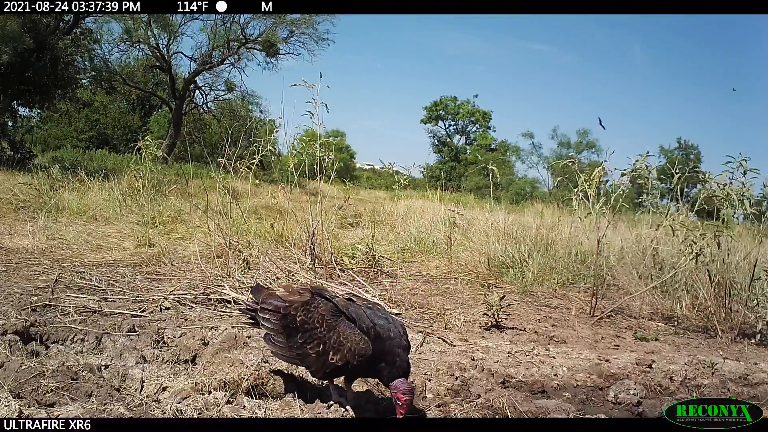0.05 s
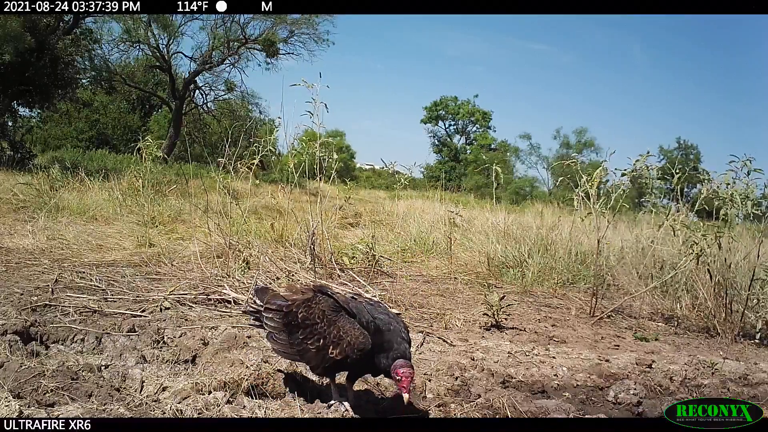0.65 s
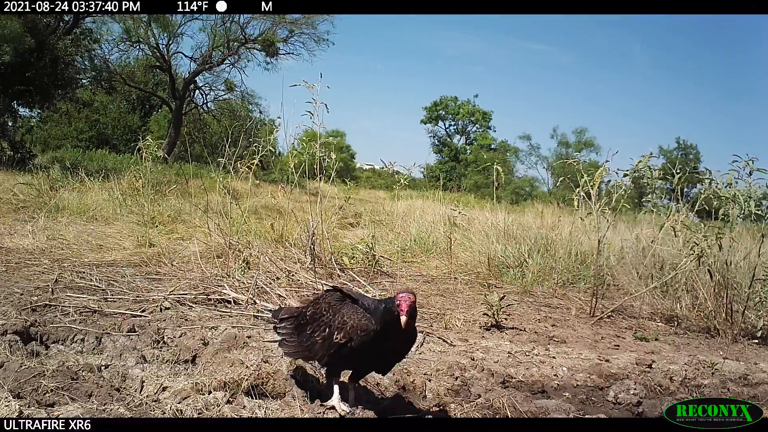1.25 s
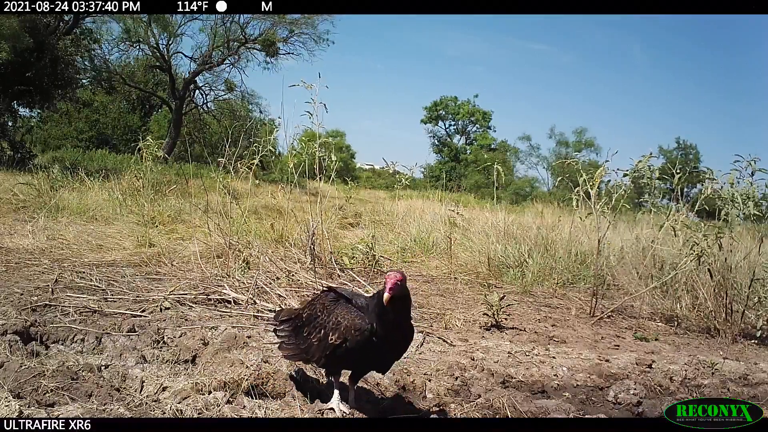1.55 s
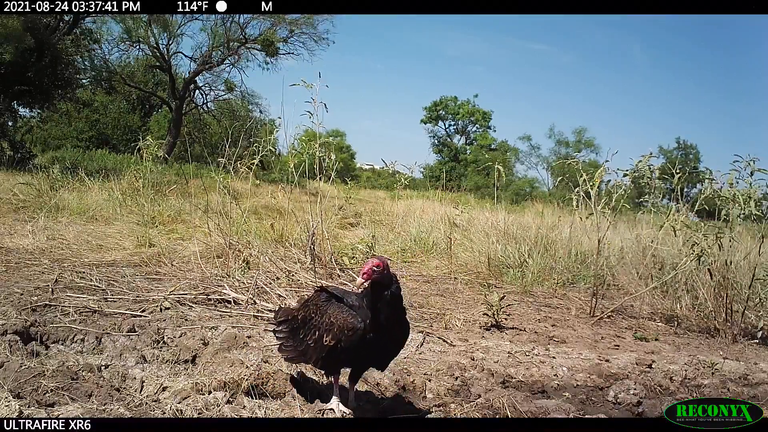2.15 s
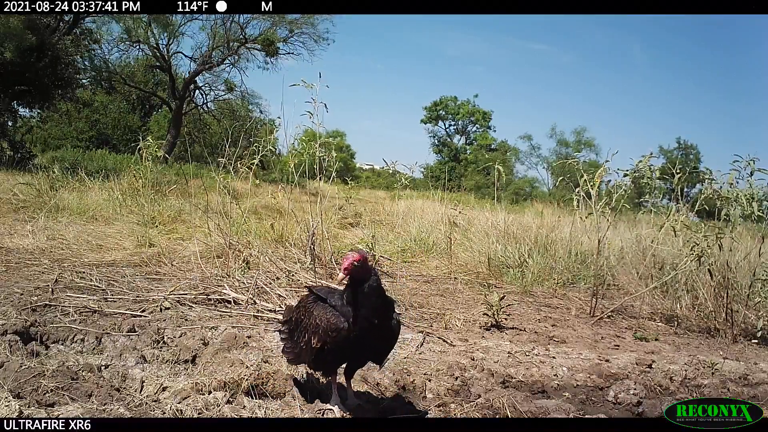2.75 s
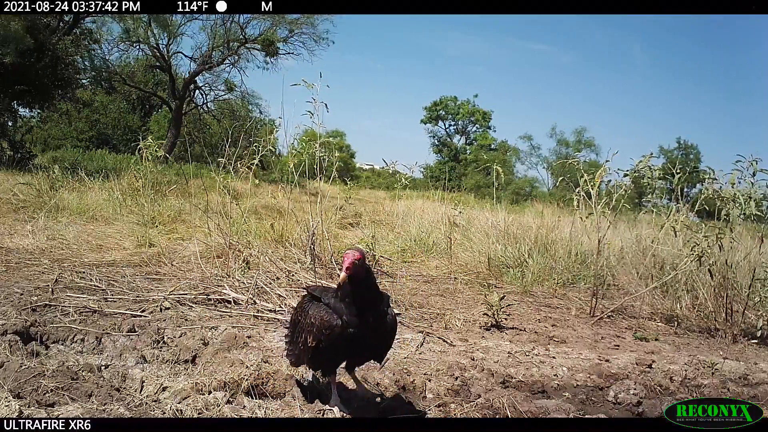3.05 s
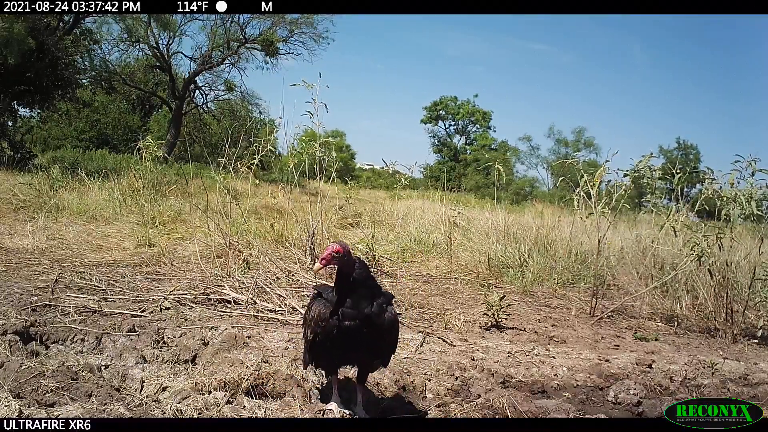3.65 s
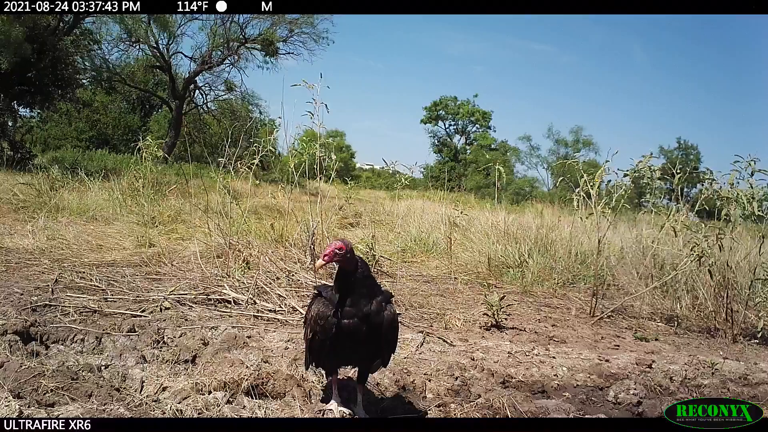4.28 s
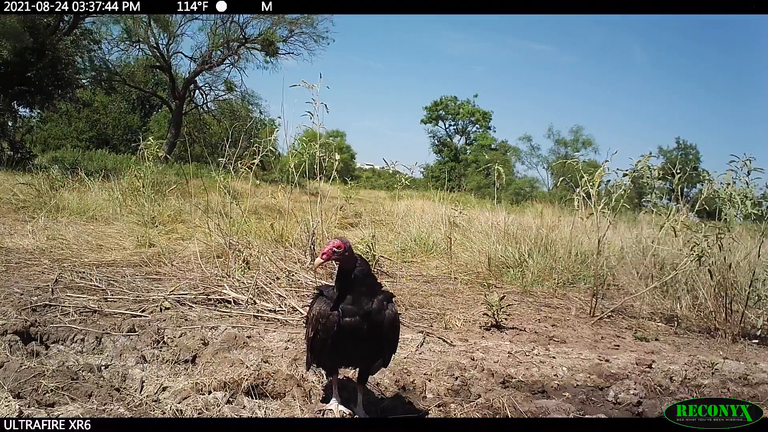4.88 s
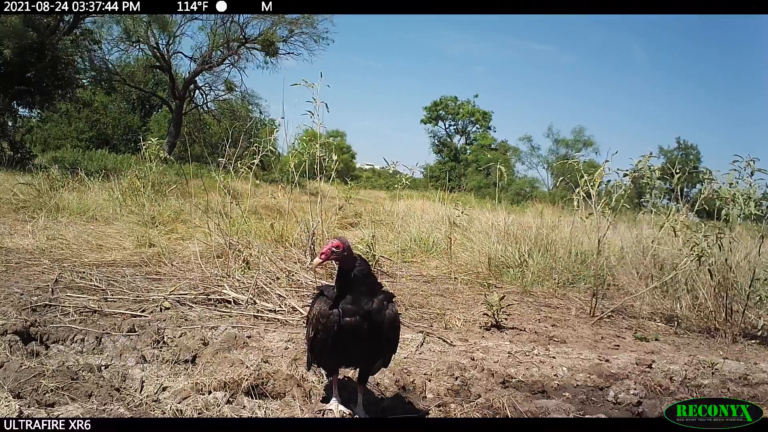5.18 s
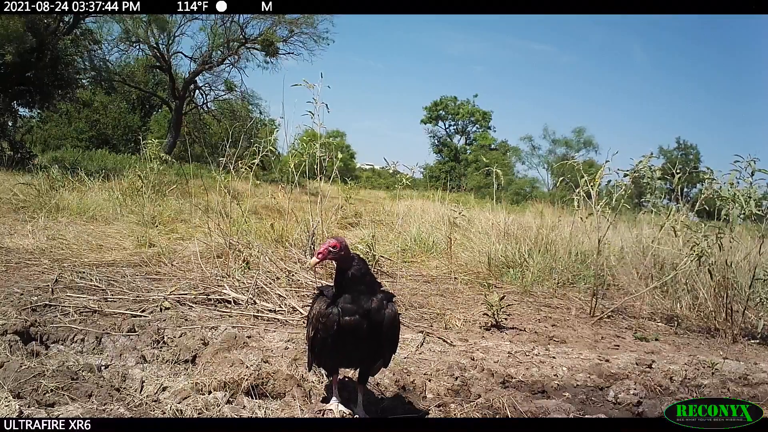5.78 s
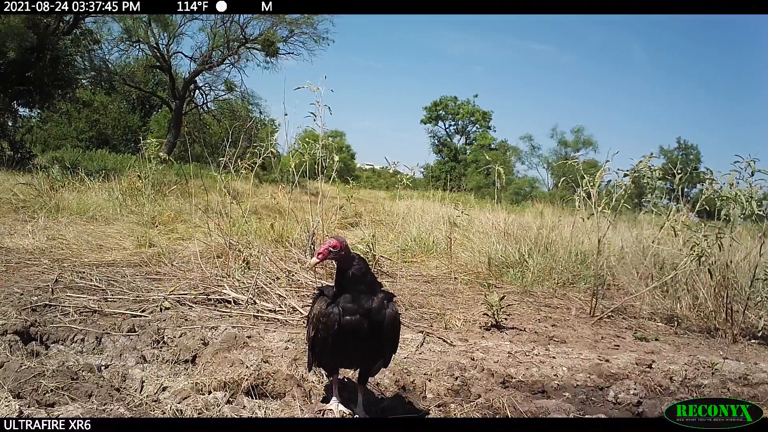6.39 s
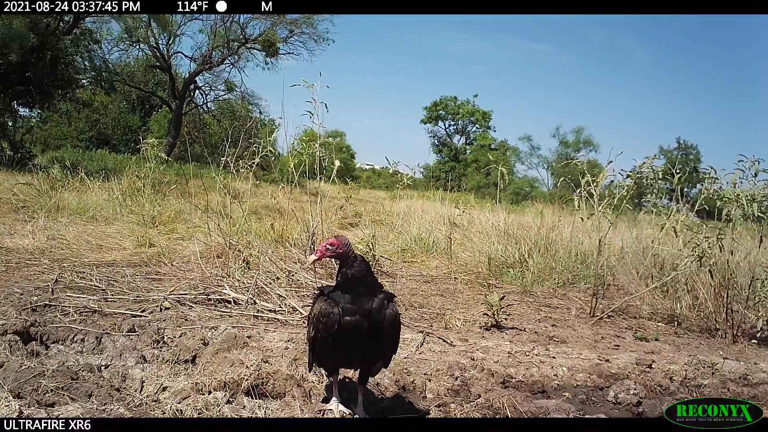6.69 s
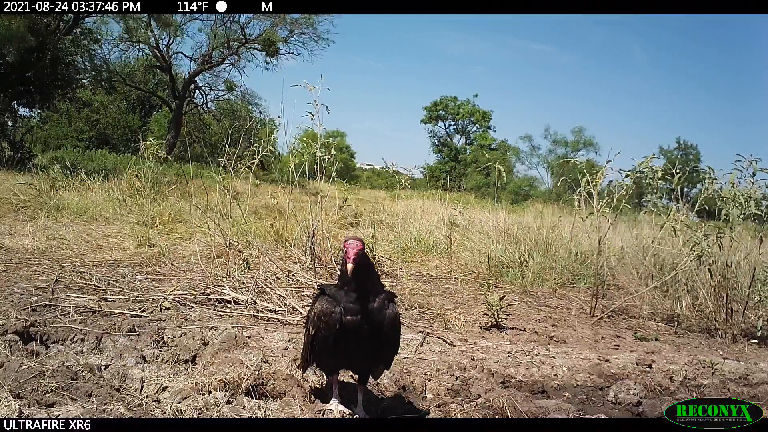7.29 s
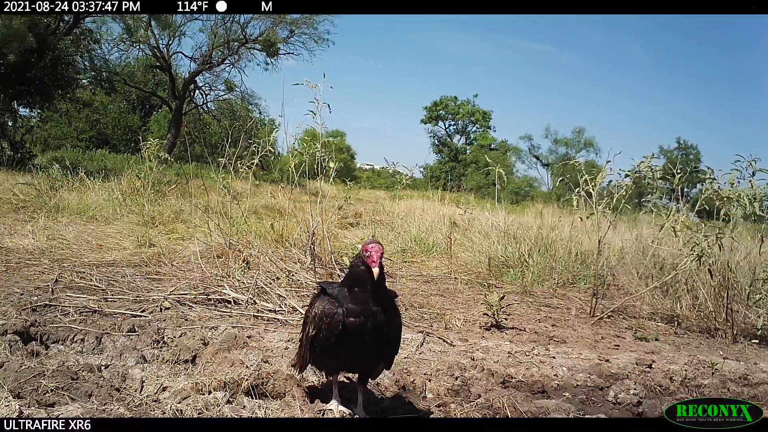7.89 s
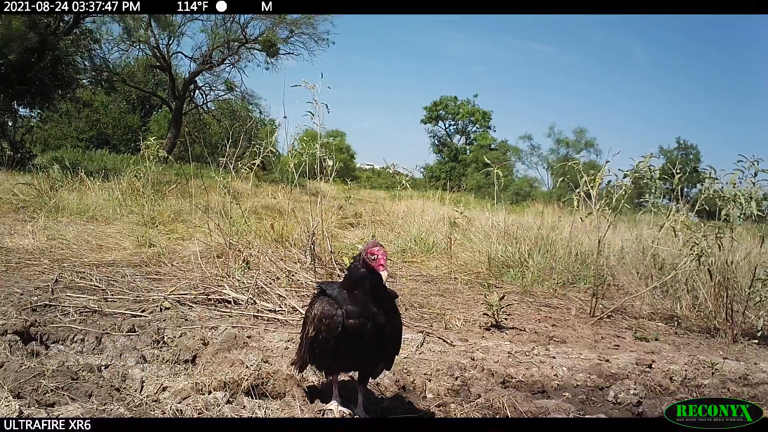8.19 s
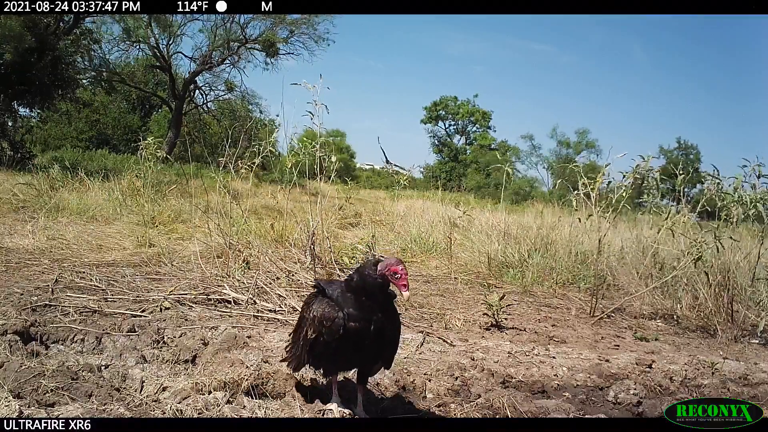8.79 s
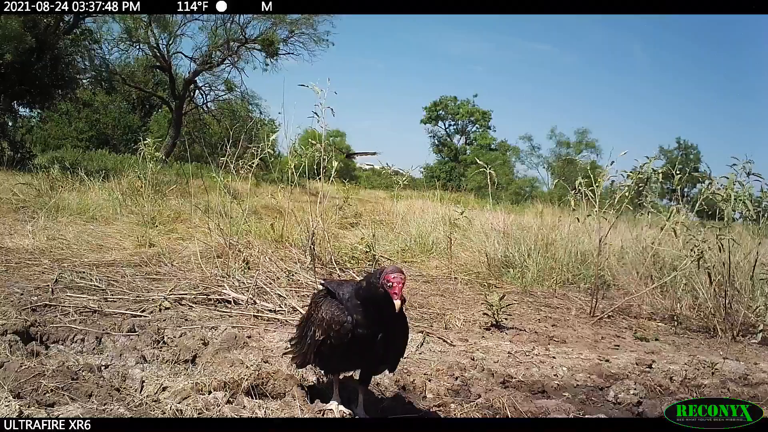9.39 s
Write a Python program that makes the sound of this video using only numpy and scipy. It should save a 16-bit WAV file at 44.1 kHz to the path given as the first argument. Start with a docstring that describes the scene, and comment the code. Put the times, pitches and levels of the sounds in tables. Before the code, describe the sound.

Two cicadas buzz throughout in a dry, open field, high and sharp, each throbbing five or six times a second. The nearer one is crisper, the farther slightly quicker, and they drift in and out of step over a steady sizzling chorus and a faint distant rush. A small bird gives thin, rising chips at about 2, 2.9, 3.8, 5.3, 6.1 and 6.3 seconds. Dry grass ticks faintly near 1.5 seconds and again around 8 and 8.5. At 4 seconds comes a very brief, growing dry rattle. Wind is only a soft low rumble at first; from about 5 seconds gusts buffet the microphone, shifting between left and right. They strengthen from 7 seconds, rumbling and fluttering, with low thumps near 5.5, 7.4 and 9.1 and the hardest at about 8.4. Cicadas and wind continue to the end, around 9.5 seconds.

```python
"""Cicadas in a dry field

Two cicadas throb in the trees, drifting in and out of step over a steady, farther chorus. Each syllable
is a swelling train of tymbal clicks that rings the abdomen and is scattered by the foliage. Dry grass
ticks, a small bird gives a few thin rising chips, and something rattles briefly. From halfway, gusts
buffet the two microphone ports with turbulent pressure, over a faint distant rush."""
import sys
import numpy as np
from scipy import signal
from scipy.fft import rfft, irfft, next_fast_len
from scipy.io import wavfile
from scipy.ndimage import uniform_filter1d

SR = 44100
rng = np.random.default_rng(int(sys.argv[2]) if len(sys.argv) > 2 else 0)


def file_out(sig):
    """Save sig as 16-bit WAV at sys.argv[1]."""
    # one column per channel
    cols = np.atleast_2d(sig).T
    # limit, then scale
    lim = np.clip(cols, -1, 1)
    pcm = np.round(lim * 32767).astype(np.int16)
    wavfile.write(sys.argv[1], SR, pcm)


N = 420713
FFT_SIZE = 2 * next_fast_len(N // 2 + SR // 2, True)   # even, with room for tails


def from_db(db):
    """Amplitude grows tenfold for every 20 dB."""
    return 10 ** (np.asarray(db) / 20)


def unit_rms(x):
    """Normalisation to a mean power of 1."""
    return x / np.sqrt(np.mean(x ** 2) + 1e-20)


def in_time(curve):
    """Linear interpolation of (time_s, value) rows at every sample."""
    return np.interp(np.arange(N) / SR, *np.transpose(curve))


def at_bins(curve):
    """Interpolation of (frequency_hz, value) rows at every FFT bin, on a logarithmic axis."""
    hz, value = np.transpose(curve)
    bins = np.linspace(0, SR / 2, FFT_SIZE // 2 + 1)
    return np.interp(np.log(bins + 1), np.log(hz), value)


def filtered(x, response):
    """Linear filtering multiplies the spectrum by a frequency response."""
    return irfft(rfft(x, FFT_SIZE) * response)[..., :N]


def resonant(spectrum):
    """A resonator rings only after it is struck: folding the cepstrum gives minimum phase."""
    cepstrum = irfft(np.log(from_db(at_bins(spectrum))))
    cepstrum[0] /= 2
    return np.exp(rfft(2 * cepstrum[:FFT_SIZE // 2], FFT_SIZE))


def drift(rate_hz):
    """Random modulation of unit rms, moving to a new value rate_hz times a second."""
    knots = rng.standard_normal(N // 20)
    return unit_rms(np.interp(np.arange(N) / SR * rate_hz, np.arange(len(knots)), knots))


def foliage(x, t60_s, sway_hz=1.787):
    """Scattering: swaying leaves return a slowly changing spray of echoes, different at each port."""
    t = np.arange(SR // 4) / SR
    echoes = rng.standard_normal((4, len(t))) * from_db(-60 * t / t60_s)
    echoes /= np.sqrt(np.sum(echoes ** 2, axis=1, keepdims=True))
    spray = signal.oaconvolve(np.tile(x, (len(echoes), 1)), echoes, axes=1)[:, :N]
    sway = np.pi / 2 * drift(sway_hz)
    return np.cos(sway) * spray[:2] + np.sin(sway) * spray[2:]


def at_ports(x, phase, balance):
    """Path difference: direct sound reaches the two ports with unequal phase and level."""
    lean = from_db(at_bins(balance) / 2)
    return filtered(x, np.array([lean, np.exp(-1j * at_bins(phase)) / lean]))


def syllables(starts, loud_share, steepness, stop_s, rest_db, end_s=9.62):
    """Amplitude modulation: each syllable idles, swells, holds for its last share and stops."""
    t, edges = np.arange(N) / SR, np.append(starts, end_s)
    index = np.clip(np.searchsorted(edges, t) - 1, 0, len(starts) - 1)
    left_s = edges[index + 1] - t
    to_come = np.clip(left_s / np.diff(edges)[index], 0, 1)   # falls from 1 to 0 in each syllable
    power = np.clip(left_s / stop_s, 0, 1) / (1 + (to_come / loud_share) ** steepness)
    return np.sqrt(power + from_db(rest_db) ** 2), to_come, index


def tymbals(ribs, cycle_hz, jitter_s, uneven_db):
    """Buckling: every muscle cycle snaps a few ribs in turn, one click each."""
    starts = np.flatnonzero(np.diff(np.floor(np.cumsum(cycle_hz) / SR)))
    delay_s, level_db = np.transpose(ribs)
    timing, strength = rng.standard_normal((2, 1500, len(ribs)))[:, :len(starts)]
    onsets = np.clip(starts[:, None] + (delay_s + jitter_s * timing) * SR, 0, N - 1).astype(int)
    return np.bincount(onsets.ravel(), from_db(level_db + uneven_db * strength).ravel(), N)


# strength of the overtone along its climb: frequency_hz, gain_db
OVERTONE_SPECTRUM = [(7000, -33), (10000, 1.5), (10600, 4), (11300, 0), (12300, -5.5), (13000, -11),
                     (14000, -25)]


def overtone(clicks, centre_hz, width_hz=1100, band_hz=800):
    """A moving resonance: fixed narrow bands fade in as its centre passes them."""
    ring = np.zeros(N)
    for hz in np.linspace(9500, 14000, 10):
        band = signal.lfilter(*signal.iirpeak(hz, hz / band_hz, fs=SR), clicks)
        ring += band / (1 + ((centre_hz - hz) / width_hz) ** 2)
    return unit_rms(filtered(ring, from_db(at_bins(OVERTONE_SPECTRUM))))


# syllables, each lasting until the next: start_s, level_db, overtone_db
NEAR_SONG = [(-0.05, -33.2, -51.7), (0.132, -32.6, -51.0), (0.324, -34.6, -53.0), (0.509, -32.1, -52.8),
             (0.694, -33.7, -55.7), (0.845, -34.0, -52.7), (1.019, -36.5, -53.6), (1.183, -32.7, -52.0),
             (1.357, -32.4, -51.2), (1.543, -35.6, -54.8), (1.749, -32.4, -52.4), (1.936, -32.2, -54.2),
             (2.12, -33.0, -53.6), (2.316, -35.9, -57.8), (2.5, -32.5, -54.2), (2.673, -31.5, -52.4),
             (2.829, -32.5, -54.6), (3.009, -33.9, -55.1), (3.194, -33.4, -53.6), (3.382, -34.7, -55.0),
             (3.577, -34.8, -54.4), (3.759, -32.0, -52.5), (3.938, -36.2, -55.2), (4.132, -33.2, -53.8),
             (4.319, -34.8, -54.4), (4.488, -34.3, -53.9), (4.67, -33.1, -52.7), (4.853, -35.3, -54.7),
             (5.037, -34.8, -54.6), (5.21, -31.8, -51.3), (5.397, -30.5, -51.0), (5.586, -34.5, -55.2),
             (5.776, -33.7, -53.4), (5.97, -34.2, -54.6), (6.158, -32.2, -53.6), (6.333, -34.5, -54.7),
             (6.506, -35.4, -56.1), (6.691, -34.6, -53.6), (6.871, -34.0, -55.0), (7.054, -32.5, -52.4),
             (7.254, -33.0, -53.4), (7.443, -32.5, -52.3), (7.639, -32.8, -53.5), (7.824, -35.2, -55.3),
             (8.012, -36.0, -56.7), (8.193, -34.2, -55.2), (8.367, -34.5, -54.8), (8.541, -38.7, -56.5),
             (8.725, -36.8, -57.7), (8.899, -34.3, -54.8), (9.086, -34.9, -55.6), (9.26, -35.8, -54.8),
             (9.445, -35.0, -57.9)]
# rib clicks in one tymbal cycle: delay_s, level_db
NEAR_RIB_CLICKS = [(0, -11.5), (.00105, -14), (.0023, -15.5), (.00335, -11.5)]
# resonance of the abdomen: frequency_hz, gain_db
NEAR_ABDOMEN = [(4000, -50.5), (5500, -28.5), (6400, -19.5), (7000, -14), (7450, -2.5), (7800, -4),
                (8120, 3.5), (8370, 7), (8750, -1), (9200, 5), (9650, 1), (10000, -2), (10700, -12),
                (11800, -26), (13200, -28.5), (15000, -46.5)]
# phase lead of the left port: frequency_hz, lead_rad
NEAR_LEAD = [(5000, 2), (7000, 0.1), (7300, 0.5), (7800, -1.45), (8400, -2.0), (8900, -2.5), (9600, -3.5),
             (10200, -2.5), (10800, -5.5), (11500, -5.5), (15000, -5.5)]
# level difference between the ports: frequency_hz, left_over_right_db
NEAR_LEAN = [(7000, 2), (7600, .3), (8000, -1.5), (9300, -3.5), (10000, 1), (11200, -2.5)]


def near_cicada(swell_db=0.5, ring_growth_db=10.5, waver_db=0.82):
    """Impulse-driven resonance: crisp clicks ring the abdomen; an overtone climbs in each syllable."""
    starts, level_db, overtone_db = np.transpose(NEAR_SONG)
    gain, to_come, index = syllables(starts, loud_share=0.57, steepness=23, stop_s=0.01, rest_db=-28)
    gain *= from_db(waver_db * drift(28))   # the insect's effort wavers
    cycle_hz = 111 + 8 * to_come + 2.8 * drift(15)
    clicks = tymbals(NEAR_RIB_CLICKS, cycle_hz, jitter_s=.00005, uneven_db=0.9)
    body = gain * unit_rms(filtered(clicks, resonant(NEAR_ABDOMEN)))
    body *= from_db(level_db[index] - 1.17 + swell_db * (.5 - to_come))
    ring = gain * overtone(clicks, centre_hz=12000 - 3600 * to_come)
    ring *= from_db(overtone_db[index] + 2 - ring_growth_db * to_come)
    # leaves scatter the short waves of the overtone most
    scattered = from_db(-11.5) * foliage(body, t60_s=0.027) + from_db(1) * foliage(ring, t60_s=0.061)
    return at_ports(body + ring, NEAR_LEAD, NEAR_LEAN) + scattered


# syllables, each lasting until the next: start_s, level_db
FAR_SONG = [(-.05, -36), (.11, -35.5), (.27, -36), (.435, -37.5), (.605, -34.5), (.78, -36), (.945, -33.5),
            (1.105, -34), (1.26, -36.5), (1.415, -36.5), (1.585, -39.5), (1.76, -36), (1.92, -38.5),
            (2.085, -39.5), (2.25, -34.5), (2.405, -35.5), (2.56, -33.5), (2.725, -37), (2.895, -36.5),
            (3.085, -38), (3.255, -39), (3.405, -40), (3.57, -35), (3.695, -36), (3.845, -41),
            (4.02, -38.5), (4.21, -35), (4.39, -33.5), (4.54, -35), (4.715, -36.5), (4.865, -39),
            (5.025, -41), (5.215, -43), (5.375, -39.5), (5.535, -36.5), (5.705, -36), (5.855, -37.5),
            (6.025, -40), (6.22, -39), (6.395, -38.5), (6.565, -43), (6.755, -42), (6.92, -38.5),
            (7.095, -44), (7.23, -38), (7.39, -41), (7.565, -41), (7.735, -39.5), (7.905, -37.5),
            (8.075, -38.5), (8.235, -40.5), (8.415, -40.5), (8.59, -38), (8.745, -40), (8.935, -41.5),
            (9.105, -39.5), (9.275, -38.5), (9.455, -41)]
# rib clicks in one tymbal cycle: delay_s, level_db
FAR_RIB_CLICKS = [(0, -8.5), (.00105, -9.5), (.0021, -6), (.00315, -8.5), (.0042, -7)]
# resonance of the abdomen: frequency_hz, gain_db
FAR_ABDOMEN = [(4000, -35.5), (5700, -25), (6300, -14), (6700, -9.5), (7000, 0.5), (7400, 7), (7800, 6),
               (8300, 6.5), (8730, -0.5), (9200, 2.5), (9600, -3.5), (10000, -9), (10400, -8), (11200, -16),
               (12500, -23), (15000, -51)]
# phase lead of the left port: frequency_hz, lead_rad
FAR_LEAD = [(6000, 2.44), (7000, 1.04), (8000, 0.6), (9300, 0.2), (10200, -2), (11500, -2.5), (15000, -5)]
# level difference between the ports: frequency_hz, left_over_right_db
FAR_LEAN = [(7000, 5.8), (7700, 2.1), (8200, 1.3), (9200, 1.3), (10200, 2.2)]


def far_cicada(scatter_db=-7.5):
    """Impulse-driven resonance of a duller abdomen, in a slightly quicker throb with a softer swell."""
    starts, level_db = np.transpose(FAR_SONG)
    gain, to_come, index = syllables(starts, loud_share=0.64, steepness=9.2, stop_s=0.039, rest_db=-13)
    cycle_hz = 113 + 6 * to_come + 3.5 * drift(11)
    clicks = tymbals(FAR_RIB_CLICKS, cycle_hz, jitter_s=.00006, uneven_db=2.96)
    song = gain * from_db(level_db[index]) * unit_rms(filtered(clicks, resonant(FAR_ABDOMEN)))
    return at_ports(song, FAR_LEAD, FAR_LEAN) + from_db(scatter_db) * foliage(song, t60_s=0.041)


def chorus(level_db=-43.5):
    """Incoherent summation: cicadas farther off merge into a steady sizzle."""
    sizzle = filtered(rng.standard_normal((2, N)), from_db(at_bins(FAR_ABDOMEN)))
    return from_db(level_db) * unit_rms(sizzle)


# spectrum of the distant rush: frequency_hz, density_db
RUSH_SPECTRUM = [(60, -2.5), (200, 3.5), (450, 0.5), (820, 0.76), (1100, -3), (2000, -7), (3200, -10.5),
                 (5000, -11.5), (9000, -6.5), (15000, -22.5)]
# likeness of the rush at the two ports: frequency_hz, correlation
RUSH_CORRELATION = [(60, 1), (600, 0.63), (1400, 0.54), (3000, 0.082), (5000, -0.12), (15000, 0.63)]
# slight swell midway: time_s, gain_db
RUSH_GAIN = [(0, -0.7), (4.6, 0.7), (6, -0.04), (9.5, 0)]


def distant_rush(level_db=-54.0):
    """Partial coherence: the faint rush of open country is alike at both ports in the lows."""
    alike = np.clip(at_bins(RUSH_CORRELATION), -1, 1)
    response = from_db(at_bins(RUSH_SPECTRUM)) * np.sqrt([1 + alike, 1 - alike])
    mid, side = filtered(rng.standard_normal((2, N)), response)
    rush = unit_rms(np.array([mid + side, mid - side]) * from_db([[-.5], [.5]]))
    return from_db(level_db + in_time(RUSH_GAIN)) * rush


# breeze under the gusts, freshening twice: time_s, rumble_db
BREEZE_LEVEL = [(0, -45), (.9, -38.5), (1.72, -45.5), (1.95, -45), (2.9, -49.5), (3.1, -47), (4.1, -46.5),
                (4.75, -48), (5.0, -35.5), (6.1, -34.5), (6.66, -38.5), (6.82, -25.5), (7.4, -26.5),
                (8.9, -32.5), (9.5, -26.5)]
# gusts: middle_s, length_s, rumble_db, flutter_db, left_over_right_db
WIND_GUSTS = [(0.205, 0.4, -40.5, -53.5, -2), (1.718, 0.029, -36, -65, -3), (3.077, 0.048, -41.5, -58, 2),
              (3.703, 0.77, -51, -60, 2), (5.21, 0.21, -33.5, -65, -8), (5.49, 0.047, -32, -56, 15),
              (5.656, 0.093, -26.5, -54, 15), (5.734, 0.12, -33, -41, 11), (6.376, 0.056, -27.5, -40.5, -1),
              (6.468, 0.043, -29.5, -43, -6), (6.94, 0.12, -32.5, -39, 19), (7.213, 0.32, -23, -36.5, 4.5),
              (7.285, 0.028, -18, -28.5, 20), (7.365, 0.028, -21, -25.5, -8), (7.453, 0.035, -18, -33, -1),
              (7.521, 0.14, -23, -38.5, -4), (7.833, 0.052, -14.5, -29.5, 6),
              (7.996, 0.26, -19.5, -30, -3.5), (8.154, 0.025, -24, -34, 0), (8.529, 0.029, -19.5, -35, -1),
              (8.454, 0.092, -17, -25, -5.5), (8.469, 0.014, -18, -27, -18),
              (8.586, 0.27, -24.5, -36.5, 13), (8.709, 0.13, -19, -27, 0), (8.706, 0.021, -16.5, -24, -7),
              (8.85, 0.15, -19.5, -36, 4), (8.944, 0.041, -27, -30.5, 9), (9.098, 0.086, -20.5, -34.5, 7),
              (9.114, 0.024, -21, -28.5, 17)]


def airflow(calm_rumble_db=-43.5, calm_flutter_db=-56, flutter_slope=0.27):
    """Addition of powers: bell-shaped gusts build on the breeze, each leaning toward one port."""
    t, breeze_db = np.arange(N) / SR, in_time(BREEZE_LEVEL)
    rumble = from_db(breeze_db) ** 2
    flutter = from_db(calm_flutter_db + flutter_slope * (breeze_db - calm_rumble_db)) ** 2
    lean = np.zeros(N)
    for middle_s, length_s, rumble_db, flutter_db, side_db in WIND_GUSTS:
        bell = .5 ** np.minimum((2 * (t - middle_s) / length_s) ** 2, 60)
        push = from_db(rumble_db) ** 2 * bell
        rumble += push
        lean += side_db * push
        flutter += from_db(flutter_db) ** 2 * bell
    return 10 * np.log10(rumble), 10 * np.log10(flutter), lean / rumble


def eddies(spectrum, even_s):
    """Uncorrelated pressure at the two ports, of even strength over spans longer than even_s."""
    noise = filtered(rng.standard_normal((2, N)), from_db(at_bins(spectrum)))
    power, window = np.mean(noise ** 2, axis=0), int(even_s * SR)
    return noise / np.sqrt(uniform_filter1d(uniform_filter1d(power, window), window))


# pressure of slow eddies: frequency_hz, density_db
RUMBLE_SPECTRUM = [(10, -12.5), (22, 5.5), (42, -0.5), (62, -4.5), (85, -7), (120, -20.5), (180, -29.5),
                   (300, -57), (600, -76)]
# pressure of quick eddies: frequency_hz, density_db
FLUTTER_SPECTRUM = [(45, -25), (80, -15.5), (110, 3), (160, -6), (220, -11), (320, -20), (480, -29.5),
                    (800, -46.5), (1600, -61), (4000, -62), (8000, -86)]


def wind(rumble_gain_db=3.0, lumpy_db=4.5, sharpen=0.58):
    """Turbulence presses on each port separately; the stronger the gust, the finer its eddies."""
    rumble_db, flutter_db, side_db = airflow()
    flutter = eddies(FLUTTER_SPECTRUM, even_s=0.039)
    flutter *= from_db(lumpy_db * np.array([drift(60), drift(60)]))
    fine = filtered(flutter, from_db(at_bins([(120, -27), (260, -2.5)])))
    flutter += fine * (from_db(sharpen * (flutter_db + 32)) - 1)   # brighter above -32 dB, duller below
    rumble = from_db(rumble_db + rumble_gain_db) * eddies(RUMBLE_SPECTRUM, even_s=0.17)
    # constant-power panning
    pan = from_db(np.array([side_db, -side_db]) / 2) / np.sqrt(np.cosh(side_db * np.log(10) / 20))
    return pan * (rumble + from_db(flutter_db) * flutter)


# dry ticks in the grass: start_s, level_db
GRASS_TICKS = [(1.430, -51), (1.567, -47), (7.905, -49), (8.441, -46), (8.461, -52)]


def ticks_and_rattle(gain_db=19.5, rattle_start_s=4.004, rattle_step_s=.0174, growth_db=1.2):
    """Impulse response: short, high, dry ticks; one growing rattle, perhaps insect wings or a bird."""
    rattle = [(rattle_start_s + k * rattle_step_s, -54.5 + k * growth_db) for k in range(9)]
    start_s, level_db = np.transpose(GRASS_TICKS + rattle)
    clicks = np.bincount((start_s * SR).astype(int), from_db(level_db + gain_db), N)
    ring = resonant([(1500, -25), (4300, -10), (5300, -2), (6400, 10), (8000, -1), (14000, -23)])
    ticks = filtered(clicks, ring)
    return ticks + from_db(5) * foliage(ticks, t60_s=0.032)


# bird chips: start_s, level_db, decay_s, start_pitch_hz
BIRD_CHIPS = [(2.034, -31, .014, 5650), (2.902, -31, .026, 5750), (3.831, -29, .03, 5750),
              (5.2695, -25, .02, 5450), (6.062, -32, .007, 5550), (6.298, -27, .022, 5450)]


def bird(knee_hz=6640, top_hz=8400, leap_s=.0033, climb_s=.024, attack_s=.004, rough_hz=150):
    """Frequency modulation: each thin, rough whistle leaps to a knee, then climbs slower as it fades."""
    t, chips = np.arange(SR // 10) / SR, np.zeros(N)
    roughness_hz = rough_hz * drift(1100)
    rise = np.sin(np.pi / 2 * np.minimum(t / attack_s, 1)) ** 2
    for start_s, level_db, decay_s, start_hz in BIRD_CHIPS:
        span = slice(round(start_s * SR), round(start_s * SR) + len(t))
        pitch_hz = top_hz - (top_hz - knee_hz) * np.exp(-t / climb_s)
        pitch_hz -= (knee_hz - start_hz) * np.exp(-t / leap_s)
        whistle = np.sin(2 * np.pi * np.cumsum(pitch_hz + roughness_hz[span]) / SR)
        fade = np.exp(-np.maximum(t - attack_s, 0) / decay_s)
        chips[span] += from_db(level_db) * whistle * rise * fade
    return chips * from_db([[0], [-3]]) + from_db(-4) * foliage(chips, t60_s=0.098)


# single large eddies that slap the ports: middle_s, half_width_s, level_db, left_over_right_db
LARGE_EDDIES = [(5.49, 0.0069, -19.5, 12), (7.374, 0.0062, -11.5, -3), (8.448, 0.0041, -2.5, -6),
                (9.11, 0.0029, -18, 10)]


def buffets():
    """A bipolar pressure pulse: a passing eddy first sucks at the ports, then pushes."""
    pressure = np.zeros((2, N))
    for middle_s, half_width_s, level_db, side_db in LARGE_EDDIES:
        passage = np.clip((np.arange(N) / SR - middle_s) / half_width_s, -10, 10)
        pulse = passage * np.exp((1 - passage ** 2) / 2)
        pressure += from_db(level_db + side_db * np.array([[.5], [-.5]])) * pulse
    return pressure


def scene():
    """Superposition: the pressures of all the sources add at each port."""
    cicadas = near_cicada() + far_cicada() + chorus()
    return cicadas + distant_rush() + wind() + ticks_and_rattle() + bird() + buffets()


# steady bias of each input, left then right: offset_full_scale
INPUT_BIAS = [
    [-.0473],
    [-.0237],
]


def record(dry, cutoff_hz=14900):
    """Soft saturation rounds the strongest buffets; the input sits off zero; a low-pass cuts the top."""
    rounded = np.tanh(dry) + INPUT_BIAS
    return signal.sosfilt(signal.ellip(10, .1, 80, cutoff_hz, fs=SR, output="sos"), rounded)


dry = scene()
out = record(dry)
file_out(out)
```